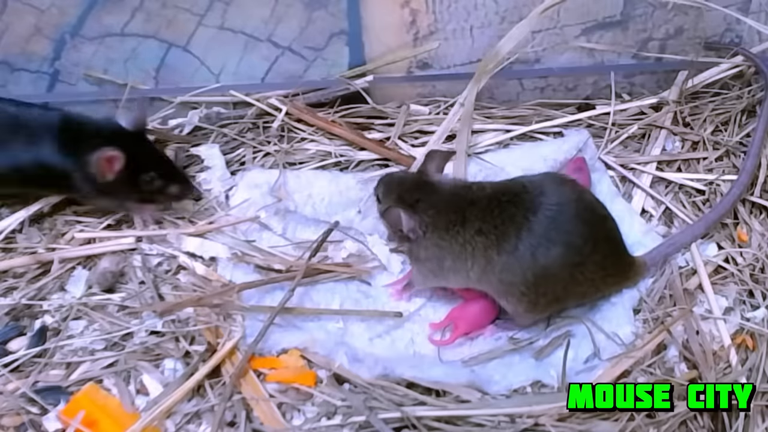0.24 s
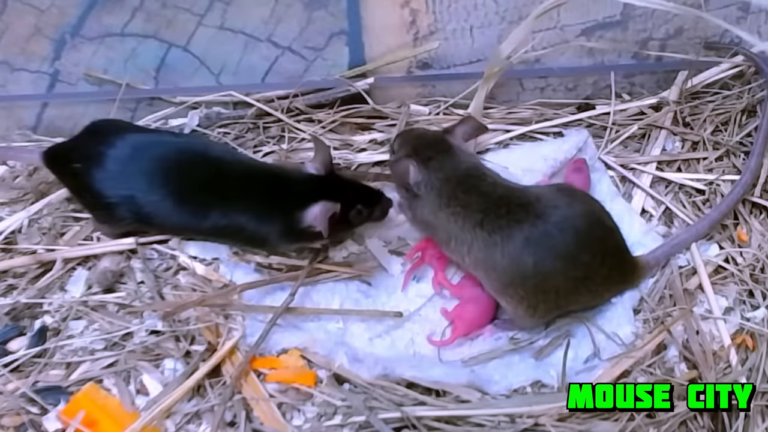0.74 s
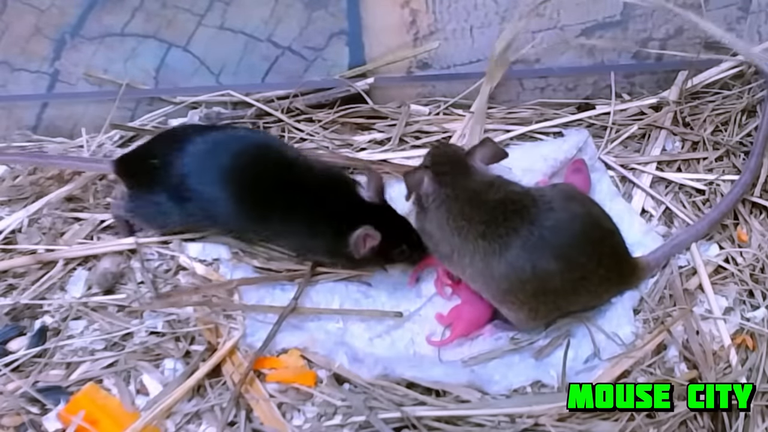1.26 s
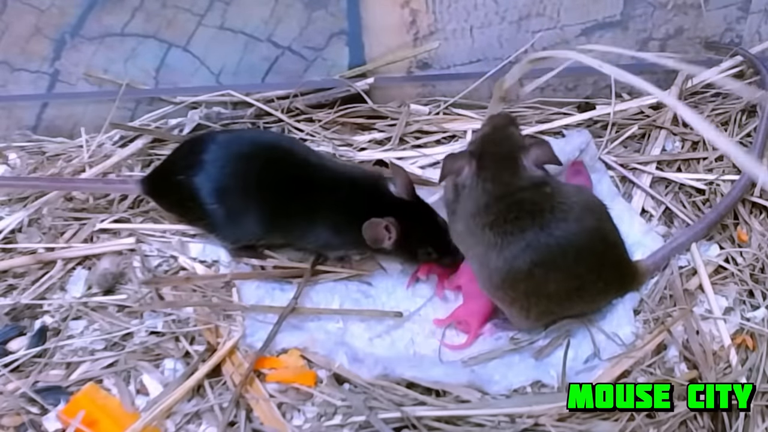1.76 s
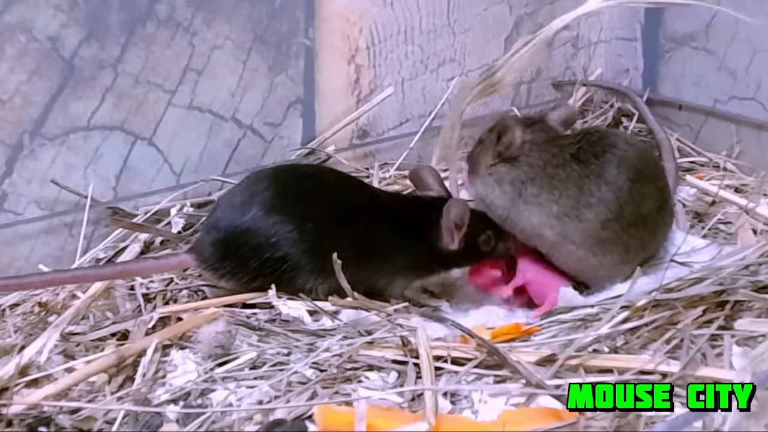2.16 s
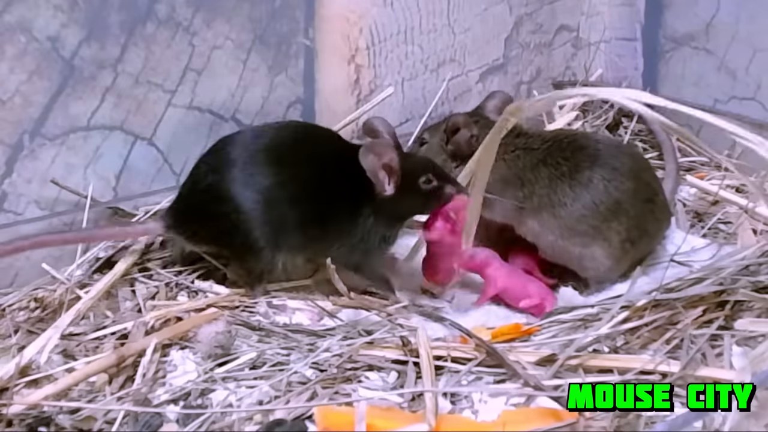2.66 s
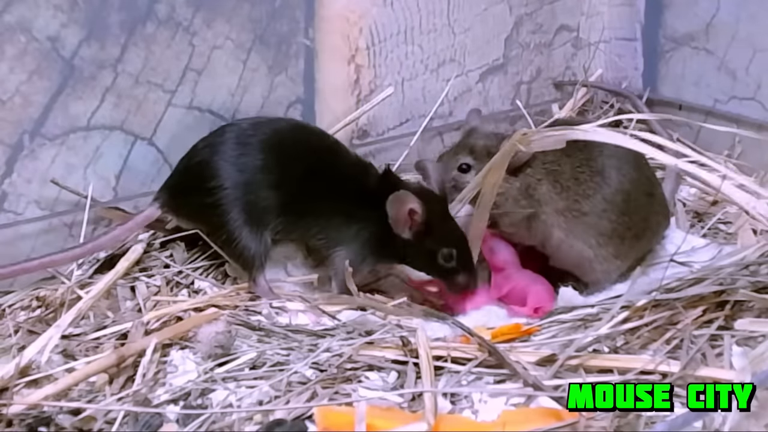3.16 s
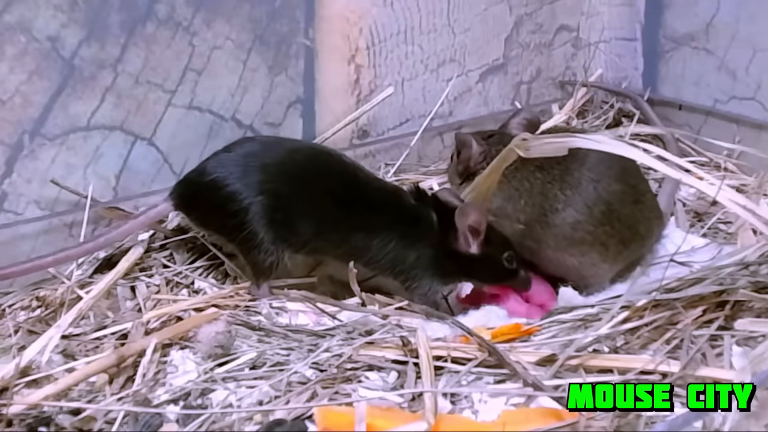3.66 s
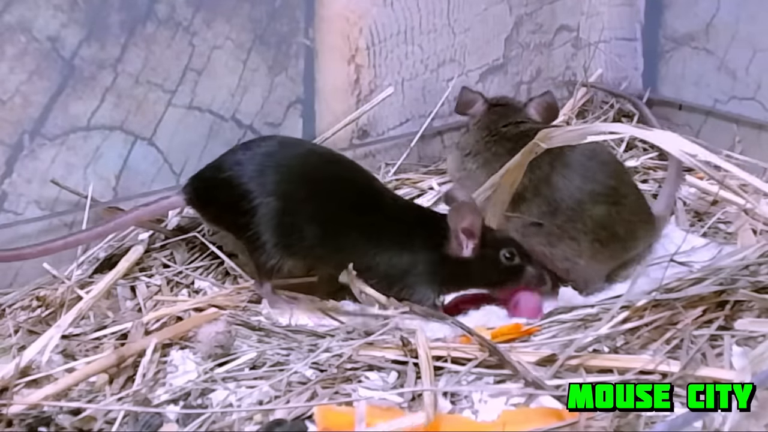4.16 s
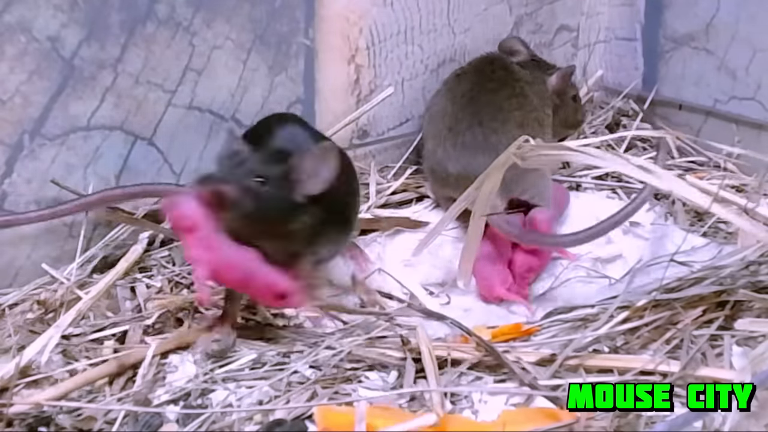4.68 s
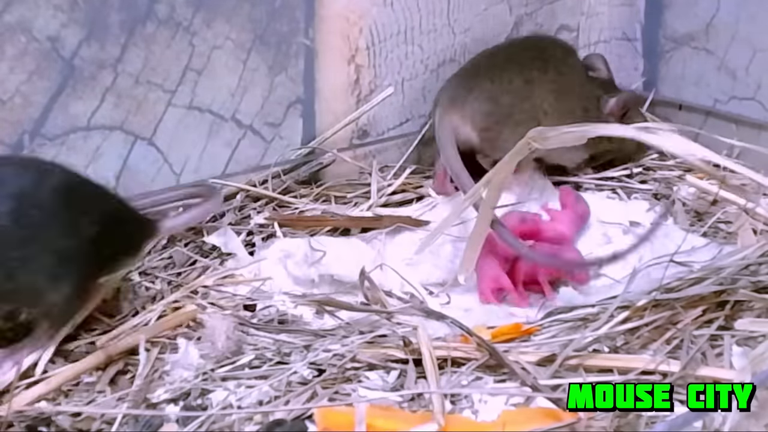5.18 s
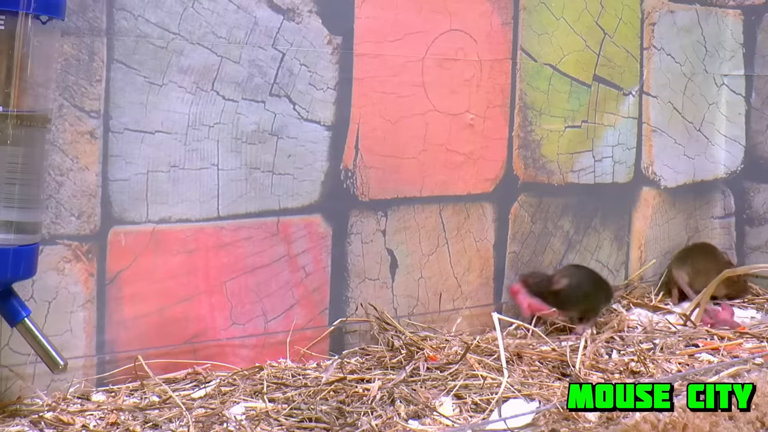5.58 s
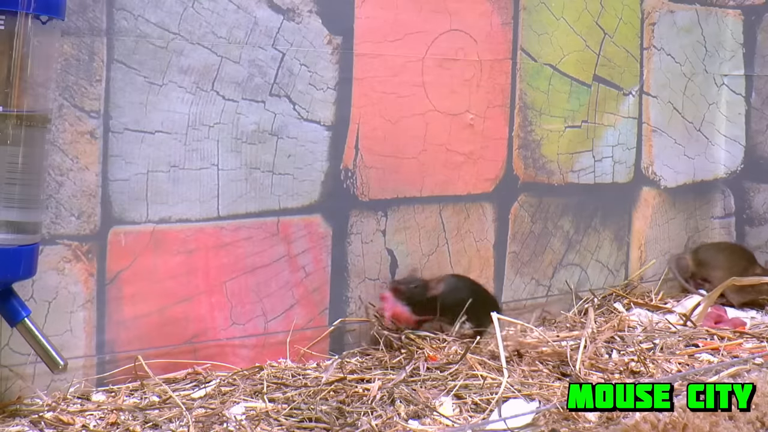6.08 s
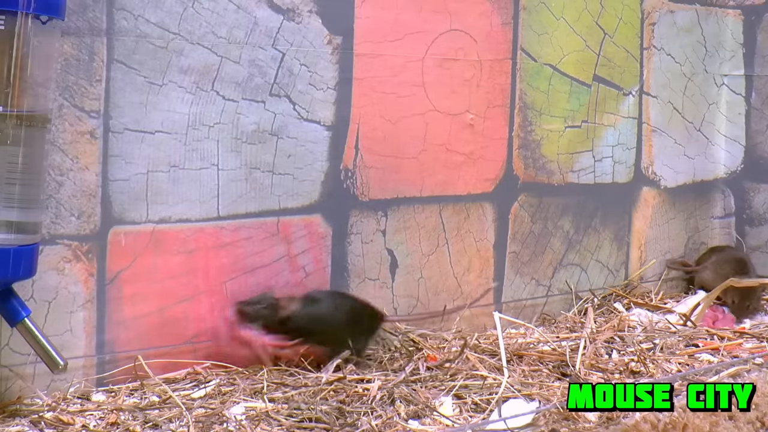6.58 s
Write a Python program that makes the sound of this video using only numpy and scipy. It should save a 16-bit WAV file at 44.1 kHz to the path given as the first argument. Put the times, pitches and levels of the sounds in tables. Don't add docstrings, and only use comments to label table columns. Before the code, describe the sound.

A small indoor cage with dry hay is heard closely in stereo, with soft air noise, low rumble and a faint gated electronic whine, stronger at first. From 0.1 to 0.7 s feet knock, tap and scuff, sharpest near 0.3, with hay rustles. A short pitched scrape and stalk snap come around 1.2. The tone changes at 2.05 and a pup begins: a muffled squeak and hum at 2.1, a yelp at 2.33, a long arched squeak at 2.6. A low thud meets a rising yelp at 2.9, then softer and falling squeaks at 3.2 and 3.4. A hard knock lands at 3.85. Rustles and light scuffs follow from 4.3, with a two-part wavering cry at 4.8 to 4.95. At 5.4 the sound becomes mono, farther and louder in air; ticks, snaps and scuffs thicken until the end, with a longer echoing, breathy cry at 6.25.

```python
import sys
import numpy as np
from scipy import signal
from scipy.fft import rfft, irfft, next_fast_len
from scipy.io import wavfile
from scipy.ndimage import uniform_filter1d

SR = 44100
rng = np.random.default_rng(int(sys.argv[2]) if len(sys.argv) > 2 else 0)


def unload_audio(sound):
    columns = np.transpose(np.atleast_2d(sound))
    steps = np.round(np.clip(columns, -1, 1) * 32767)
    wavfile.write(sys.argv[1], SR, steps.astype(np.int16))


def attenuation_scalar(level_db):
    decades = np.asarray(level_db, float) / 20
    return 10 ** decades


N = 301644

SCENE_CHANGES_S = 2.045, 5.407
TIME_S = np.arange(N) / SR
VIEW = np.searchsorted(SCENE_CHANGES_S, TIME_S)


def rms_one(x):
    return x / np.sqrt(np.mean(x ** 2) + 1e-20)


def at_hz(points, hz):
    point_hz, point_db = np.transpose(points)
    return np.interp(np.log(np.maximum(hz, 1)), np.log(point_hz), point_db)


def drift(rate_hz, size=N):
    r = np.exp(-2 * np.pi * rate_hz / SR)
    noise = rng.standard_normal(size + 9000)
    return rms_one(signal.lfilter([1], [1, -2 * r, r * r], noise)[9000:])


def resonance(x, hz, width_hz):
    r = np.exp(-np.pi * width_hz / SR)
    gain = (1 - r * r) / 2
    return signal.lfilter([gain, 0, -gain], [1, -2 * r * np.cos(2 * np.pi * hz / SR), r * r], x)


def coloured(spectrum, size, alike):
    padded = next_fast_len(size)
    hz = np.arange(padded // 2 + 1) * SR / padded
    shape = attenuation_scalar(at_hz(spectrum, hz)) * (hz < spectrum[-1][0])
    mid, side = rfft(rng.standard_normal((2, padded))) * shape
    likeness = np.clip(at_hz(alike, hz), 0, 1)
    mid = irfft(mid * np.sqrt(1 + likeness), padded)[:size]
    side = irfft(side * np.sqrt(1 - likeness), padded)[:size]
    return np.array([mid + side, mid - side]) / np.std(mid)


def by_view(*db):
    return attenuation_scalar(db)[VIEW]


def panned(x, db):
    return x * attenuation_scalar(np.array([[db / 2], [-db / 2]]))


def room_tone():
    # a spectrum [f/Hz, level/dB] and its rms [dB]
    first_air = [(15, -37), (25, -19), (157, 2.5), (285, 6), (489, -3.5), (988, -4), (1130, -9), (1400, -9),
                 (3720, -17), (5730, -20.5), (6210, -22), (6740, -15), (8140, -13.5), (16000, -44)], -57
    second_air = [(15, -50), (25, -2.5), (141, -5.5), (223, -5.5), (256, -2), (427, -12.5), (714, -10.5),
                  (1190, -16), (1290, -17.5), (4140, -22.5), (6560, -26.5), (7920, -29), (8590, -34.5),
                  (16000, -35)], -59.5
    third_air = [(15, -66), (25, -33), (123, -12), (200, -11), (285, -0.5), (531, -7.5), (754, -6),
                 (1370, -9), (1790, -10.5), (2990, -14), (3820, -11), (5570, -20.5), (10000, -32),
                 (16300, -41)], -47.5
    # [f/Hz, likeness 0..1]
    air_likeness = [(60, 0.95), (130, 0.74), (290, 0.79), (640, 0.68), (1410, 0.058), (3100, 0.016),
                    (6820, 0.052), (15000, 0.98)]
    # [f/Hz, left minus right/dB]
    first_balance = [(60, 19), (180, 2), (550, -0.5), (1650, 3), (4970, 5.5), (15000, 4)]
    # [f/Hz, level/dB in the first, second and third view]
    motor_tones = [(48.6, -65.5, -74, -78.5), (255.3, -65, -69, -56), (302.2, -69, -93, -59.5)]
    # [t/s, level/dB]
    rumble_levels = [
        (0.0, -81),
        (0.07, -57.5),
        (0.56, -56),
        (0.63, -57),
        (4.5, -62),
        (5.25, -60.5),
        (5.4, -59),
    ]
    out = np.zeros((2, N))
    edges = [0, *np.round(np.array(SCENE_CHANGES_S) * SR).astype(int), N]
    for (spectrum, db), start, end in zip((first_air, second_air, third_air), edges, edges[1:]):
        size = end - start
        out[:, start:end] = coloured(spectrum, size, air_likeness) * attenuation_scalar(db - 2.0 + drift(6, size))

    first_size = edges[1]
    hz = np.arange(first_size // 2 + 1) * SR / first_size
    tilt = attenuation_scalar(at_hz(first_balance, hz) / 2 * np.array([[1], [-1]]))
    out[:, :first_size] = irfft(rfft(out[:, :first_size]) * tilt, first_size)

    for hz, *db in motor_tones:
        tone = np.sin(2 * np.pi * hz * TIME_S + 0.27 * drift(1.3))
        out += by_view(*db) * np.sqrt(2) * attenuation_scalar(1.6 * drift(1.7)) * tone

    rumble_colour = [(12, -22.0), (30, 1.0), (70, -10.0), (130, -2.0), (200, -35)]
    rumble = coloured(rumble_colour, N, alike=[(10, 0.78), (100, 0.94)])
    rumble_db = np.interp(TIME_S, *np.transpose(rumble_levels), right=-120)
    return out + rumble * attenuation_scalar(rumble_db - 4.5)


def whine():
    # [f/Hz, on-time/s, left minus right/dB, (start/s, level/dB) in the first view, the same in the second]
    whine_tones = [(6134, 0.028, 67, (0.0123, -63.5), (.008, -80)), (8000, 0.013, 5.9, (0.03, -70),
                   (0.0028, -75.5))]
    frame_hz = 30
    out = np.zeros((2, N))
    swell_db = 1.5 * np.maximum(TIME_S - SCENE_CHANGES_S[0], 0)
    for hz, on_s, pan_db, (first_s, first_db), (second_s, second_db) in whine_tones:
        start = np.where(VIEW == 0, first_s, second_s)
        gate = uniform_filter1d(1. * ((TIME_S - start) % (1 / frame_hz) < on_s), size=60)
        level = attenuation_scalar(1.9 * drift(40) + 1.2 * drift(5) + swell_db)
        tone = np.sin(2 * np.pi * hz * TIME_S + 1.1 * drift(65)) * level
        out += by_view(first_db, second_db, -120) * gate * tone * attenuation_scalar(np.array([[3], [1.5 - pan_db]]))
    return out


def stirring():
    # [t/s, level/dB]
    bed_levels = [(0.0, -70), (0.76, -68.5), (2.06, -72), (3.53, -77.5), (4.336, -71.5), (4.79, -70.5),
                  (5.222, -69.5), (5.4, -65.5), (5.41, -63.5), (5.56, -67.5), (6.24, -58.5), (6.47, -63),
                  (6.588, -58), (6.84, -52)]
    # [t/s, peak level/dB, length/s]
    movements = [(0.091, -54, 0.04), (0.35, -61, 0.051), (0.625, -50, 0.05), (0.661, -47.5, 0.027),
                 (0.97, -57, 0.044), (1.66, -44.5, 0.021), (1.923, -60, 0.027), (2.364, -42, 0.044),
                 (4.426, -47.5, 0.06), (4.697, -56, 0.063), (5.073, -47.5, 0.079), (5.192, -49, 0.042),
                 (5.277, -50, 0.036), (5.542, -52, 0.078), (5.88, -45, 0.052), (6.004, -39, 0.014),
                 (6.166, -39, 0.043), (6.403, -38, 0.027), (6.428, -37, 0.04), (6.522, -34.5, 0.037),
                 (6.639, -30.5, 0.031), (6.726, -41, 0.022), (6.758, -39, 0.054)]
    level = attenuation_scalar(np.interp(TIME_S, *np.transpose(bed_levels)))
    for s, db, length in movements:
        since = TIME_S - s
        rise = np.clip(since / 0.0077 + 1, 0, 1)
        level = level + attenuation_scalar(db - 16.0) * rise * np.exp(-(np.maximum(since, 0) / length) ** 3)
    return level


def hay():
    centre = np.log([5960, 7900, 8550])[VIEW]
    narrow_db = np.array([6, 27, 2])[VIEW]
    patchy_db = np.array([7, 8, 4.4])[VIEW]
    born = rng.random(N) < 22000 * attenuation_scalar(1.5 * drift(35)) / SR
    size_db = 1.5 * np.minimum(rng.exponential(1, N), 4)
    grains = born * attenuation_scalar(size_db) * rng.choice([-1, 1], N)
    dealt = rng.integers(0, 14, N)
    out = np.zeros((2, N))
    for k, hz in enumerate(np.geomspace(1500, 16200, 14)):
        near = attenuation_scalar(-narrow_db * abs(np.log(hz) - centre) + patchy_db * drift(11.0))
        ring = resonance(grains * (dealt == k) * near + 1e-18, hz, 0.73 * hz)
        ring = resonance(ring, hz, 0.37 * hz)
        out += panned(ring, 1.6 * (-1) ** k + 0.39)
    running_rms = np.sqrt(uniform_filter1d(out.mean(axis=0) ** 2, size=2500) + 1e-12)
    return out / running_rms * stirring()


def bumps(events, length, rise, width, leak_db=0):
    size = 9000
    out, t = np.zeros((2, N + size)), np.arange(size) / SR
    floor_tail = attenuation_scalar(-10.5) * np.exp(-t / 0.11) * (1 - t / t[-1])
    envelope = np.clip(t / (rise * length), 0, 1) * (np.exp(-(t / length) ** 2) + floor_tail)
    for s, db, low_hz, high_hz, high_db in events:
        burst = rng.standard_normal((2, size)) * envelope
        burst[1] = 0.52 * burst[0] + 0.76 * burst[1]
        rings = []
        for hz in (low_hz, high_hz):
            broad = resonance(burst, hz, 0.24 * hz)
            leak = attenuation_scalar(leak_db - 3) * resonance(broad, hz, 1.16 * hz)
            ring = resonance(broad, hz, width * hz) + leak
            rings.append(ring / abs(ring).max())
        low, high = rings
        at = round((s - .003 - .6 * rise * length) * SR)
        low_gain = attenuation_scalar(-4 * attenuation_scalar(high_db))
        out[:, at:at + size] += attenuation_scalar(db) * (low * low_gain + attenuation_scalar(high_db) * high)
    return out[:, :N]


def knocks():
    # [t/s, peak level/dB, low ring f/Hz, high ring f/Hz, high ring level/dB]
    knock_events = [
        (0.1, -45.5, 1280, 1580, -6),
        (0.104, -47, 1600, 2000, -7),
        (0.32, -52, 352, 1390, -30),
        (0.817, -54, 304, 1920, 9),
        (1.94, -57, 273, 1790, 7),
        (2.01, -53, 294, 1190, 6.5),
        (2.909, -37, 274, 1170, -38),
        (3.855, -36.5, 943, 1730, -3),
        (3.898, -54, 865, 1940, 5.5),
    ]
    return bumps(knock_events, .04, rise=0.17, width=0.17)


def scuffs():
    # [t/s, peak level/dB, low ring f/Hz, high ring f/Hz, high ring level/dB]
    scuff_events = [(0.135, -49, 1590, 2140, -6), (0.18, -55, 1590, 900, -2), (0.359, -41, 990, 1500, -11),
                    (0.4, -48, 990, 1270, -2), (0.64, -53, 1400, 2080, 1), (0.85, -49, 900, 1900, -7),
                    (0.619, -55, 1000, 1370, -3), (1.66, -51, 568, 2100, 3), (2.766, -45.5, 623, 1420, -28),
                    (2.888, -43, 880, 1130, -35), (4.386, -44.5, 615, 1130, -24),
                    (4.503, -53.5, 604, 1080, -13), (0.975, -51, 2900, 3800, -2.5),
                    (1.03, -57, 2200, 2300, -5), (1.13, -51, 600, 1100, -2),
                    (2.26, -55.5, 1100, 1910, -1.5), (4.794, -49, 970, 1170, -17),
                    (4.997, -40.5, 613, 1110, -4.5), (5.16, -53, 638, 1120, -18),
                    (5.672, -46, 610, 1180, -11), (5.847, -38, 600, 1110, -5),
                    (5.944, -42.5, 620, 1030, -10), (6.19, -39, 407, 2170, 1), (6.237, -37, 1017, 1190, -8),
                    (6.275, -34.5, 960, 1410, -3.5), (6.31, -36, 800, 1100, -4),
                    (6.36, -36.5, 690, 434, -6.5), (6.4, -37, 335.5, 794, -3), (6.442, -35.5, 342, 1030, 0),
                    (5.694, -39.5, 640, 1200, -10), (5.816, -43.5, 600, 1080, -14),
                    (6.524, -45, 603, 2170, 0), (6.731, -44.5, 800, 1500, -0.5),
                    (6.429, -33, 600, 1340, -0.5), (6.593, -41, 1040, 1100, -23)]
    return bumps(scuff_events, .035, rise=0.71, width=0.13)


def taps():
    # [t/s, peak level/dB, low ring f/Hz, high ring f/Hz, high ring level/dB]
    tap_events = [(4.73, -55, 454, 2100, 3.5), (4.75, -57, 454, 2150, 4), (0.284, -30, 354, 1390, -17),
                  (0.304, -34.5, 338, 1380, -20), (1.233, -47, 890, 1450, -6),
                  (1.935, -45.5, 1850, 1510, -9), (2.766, -45, 606, 325, -1), (2.889, -42, 960, 604, -8),
                  (3.856, -43, 600, 910, -4), (4.388, -42, 630, 1140, -7.5), (5.0, -49, 627, 1160, -3),
                  (5.163, -44.5, 627, 1100, -10), (5.85, -39, 630, 1160, 2.5), (5.947, -38.5, 617, 980, 0),
                  (6.447, -38.5, 700, 1300, 4), (6.602, -35.5, 597, 1100, -3)]
    return bumps(tap_events, 0.01235, rise=0.141, width=0.26, leak_db=-10)


def scrape():
    # [t/s, peak level/dB, low ring f/Hz, high ring f/Hz, high ring level/dB]
    strokes = [
        (1.165, -41.5, 873, 1400, -13),
        (1.21, -54, 880, 1440, 1.5),
        (1.255, -43.5, 887, 1400, -11),
        (1.29, -42.5, 880, 1420, -3),
    ]
    return bumps(strokes, .04, rise=0.6, width=0.062, leak_db=-18)


def snaps():
    # [t/s, peak level/dB, ring f/Hz]
    snap_events = [(0.172, -42, 6100), (1.2327, -31.5, 6300), (4.315, -44, 9200), (4.4652, -37.5, 9560),
                   (4.6157, -39, 9400), (5.2839, -39, 9160), (5.46, -39, 5800), (5.7611, -35, 9200),
                   (5.8457, -38, 5790), (5.878, -26.5, 7260), (5.907, -30, 4340), (5.9885, -49, 5340),
                   (6.0123, -35, 8800), (6.0595, -30, 9200), (6.1483, -32, 6650), (6.5236, -32, 7370),
                   (6.5825, -33, 3860), (6.6165, -34, 14800), (6.6284, -34, 5570), (6.6963, -31, 3350),
                   (6.458, -43, 13000), (6.709, -26, 4130), (6.7315, -29, 4200)]
    out, t = np.zeros((2, N)), np.arange(900) / SR
    for s, db, hz in snap_events:
        crack = rng.standard_normal(900) * attenuation_scalar(-60 * t / 0.029)
        crack = resonance(crack, hz, 0.15 * hz) + 0.039 * np.diff(crack, prepend=0)
        crack = attenuation_scalar(db - 9.5) * crack / abs(crack).max()
        at = round(s * SR)
        out[:, at:at + 900] += panned(crack, 9.1 * (s < SCENE_CHANGES_S[0]))
    return out


def squeak(rows, tract, airs, first_db, fall_db, breath_db, alike, hoarse, sigh, hush):
    s, *columns = np.transpose(rows)
    sigh_s, sigh_db = sigh
    t = np.arange(s[0], s[-1] + sigh_s, 1 / SR)
    since, size = t - s[0], len(t)
    hz = uniform_filter1d(np.interp(t, s, columns[0]), size=260)
    effort_db = uniform_filter1d(np.interp(t, s, columns[1]), size=90)

    order = np.arange(1, 10)[:, None]
    dulling_db = 76 * since - 0.5 * np.exp(-since / 0.012)
    arch_end, break_end = .051, .071
    in_break = (since >= arch_end) * (since < break_end)
    hush_db = hush[0] * (since < arch_end) + hush[1] * in_break + 0.
    first_db = first_db - uniform_filter1d(hush_db, size=200)
    level_db = effort_db + at_hz(tract, order * hz) + first_db * (order == 1)
    level_db = level_db - (fall_db + dulling_db) * np.clip(order - 2, 0, 2.6)
    levels = attenuation_scalar(level_db) * (order * hz < 16200)

    broken = .4 * np.clip((.68 - hz / hz.max()) / .12, 0, 1) * (t > s[-4])
    jitter = 0.029 * (hoarse + 4 * broken) * drift(390, size)
    phase = np.cumsum(2 * np.pi * hz * (1 + jitter) / SR)
    apart = np.arccos(np.clip(alike, 0, 1)) / 2 * np.array([[1], [-1]])
    tone = 0
    for k, level in enumerate(levels):
        flutter = attenuation_scalar(1.07 * (1.5 + 0.028 * k) * drift(240, size))
        haze = (hoarse * min(.3 + .5 * k, 1) + broken) * drift(900, size)
        flutter = flutter * (1 - broken + haze)
        tone = tone + level * flutter * np.sin((k + 1) * phase + k * k + 1.08 * apart * drift(28, size))

    likeness = [(10, alike), (20, alike)]
    breath = attenuation_scalar(breath_db) * coloured(airs[0], size, likeness) * np.sqrt(np.sum(levels ** 2, axis=0))
    running_out = np.clip((t - s[-1]) / .006 + .5, 0, 1)
    escape = coloured(airs[1], size, likeness) * attenuation_scalar(sigh_db) * running_out * (t[-1] - t) / sigh_s
    air = (breath * (1 - running_out) + escape) * attenuation_scalar(1.2 * drift(100, size))
    onset = np.clip(since / 0.0027, 0, 1)
    return (np.sqrt(2) * tone * (1 - running_out) + air) * onset


def cage(x):
    t = np.arange(int(.3 * SR)) / SR
    decay = attenuation_scalar(-60 * t / 0.057) + 0.57 * attenuation_scalar(-60 * t / .24)
    tail = rng.standard_normal((2, len(t))) * decay * (t > .001)
    tail = signal.lfilter([1], [1, -.3], tail)
    tail = tail / np.sqrt(np.sum(tail ** 2, axis=1, keepdims=True))
    return signal.fftconvolve(x[None], tail, axes=1)[:, :N]


def pup():
    # [t/s, pitch f/Hz, effort level/dB]
    first_run = [
        [(2.073, 1864, -52), (2.08, 2094, -51.5), (2.091, 1980, -45.5), (2.098, 1625, -55), (2.104, 1510, -46)],
        [(2.105, 2470, -48), (2.11, 2540, -40), (2.117, 2530, -48), (2.128, 2730, -44.5), (2.14, 2630, -43),
         (2.16, 2460, -44), (2.174, 2410, -56)],
        [(2.329, 3400, -41), (2.334, 3460, -52), (2.34, 4280, -46.5), (2.348, 4340, -36.5), (2.36, 3870, -52),
         (2.373, 3800, -53)],
        [(2.574, 2200, -44), (2.58, 3070, -32), (2.587, 4050, -32.5), (2.624, 4380, -38), (2.64, 3840, -40.5),
         (2.662, 3630, -33.5), (2.688, 3955, -33), (2.708, 3200, -35), (2.722, 2650, -44)],
    ]
    second_run = [
        [(2.913, 2460, -36), (2.918, 3940, -37), (2.925, 4460, -30), (2.933, 5020, -31), (2.938, 4970, -37),
         (2.95, 5100, -72)],
        [(3.183, 1840, -64), (3.19, 2930, -38.5), (3.197, 3580, -37), (3.206, 3800, -42.5), (3.218, 3500, -48)],
        [(3.366, 2390, -46), (3.371, 4010, -40.5), (3.38, 4640, -31.5), (3.395, 4510, -39), (3.415, 4080, -42),
         (3.433, 3630, -42.5)],
        [(3.433, 3110, -42.5), (3.447, 2770, -47), (3.451, 2470, -47), (3.459, 2055, -40.5), (3.47, 1865, -46),
         (3.485, 1830, -48.5)],
    ]
    # [t/s after its start, pitch f/Hz, effort level/dB heard close, effort level/dB heard far]
    cry_arch = [
        (-.002, 1554, -58, -61),
        (.002, 2132, -50, -48),
        (.009, 3393, -36.5, -40),
        (.017, 4076, -31, -36),
        (.026, 4200, -31, -31.5),
        (.036, 3877, -32.5, -36.5),
        (.044, 3250, -36, -47),
        (.047, 3183, -46, -39),
        (0.052, 2768, -38, -41.5),
    ]
    cry_climb = [
        (.063, 2582, -36, -41),
        (.071, 2820, -40, -42.5),
        (0.076, 3200, -35.5, -42.5),
        (0.096, 3162, -34.5, -44.5),
        (.112, 3700, -35.5, -39.5),
        (0.13, 3870, -37, -36.5),
        (0.137, 3710, -35, -39),
        (.142, 3420, -38, -45),
    ]
    # [f/Hz, level/dB]
    near_tract = [(1800, -34), (2600, -8.5), (3300, -5.5), (3900, -2.5), (4300, -13.5), (4700, -24.5),
                  (5200, -8),
                  (7000, -6.5), (8500, -0.5), (10000, -7), (12500, -12), (14000, -26), (15500, -34)]
    far_tract = [(1800, 11), (2600, 3.1), (3300, 16.5), (3900, 13.8), (4300, 4.7), (4700, 17.5),
                 (5200, 2.9),
                 (7000, 5), (8500, -1.5), (10000, 2.5), (12500, 6), (14000, 15), (15500, 8)]
    # [f/Hz, level/dB]
    carried_tract = [(1800, -30), (2600, -28), (3200, -16.5), (3800, -1.5), (4200, -30), (5200, -25),
                     (6200, -5),
                     (7000, -5), (8500, 2.5), (10000, -2.5), (12500, -4), (13800, -11), (14800, -34)]
    # [f/Hz, level/dB]
    muffled = [(1800, -18), (3300, -15), (4200, -10), (5000, 1), (6200, 0), (7500, -18), (10000, -26),
               (15500, -45)]
    clearing = [(2600, -22), (4600, -2), (5400, -8), (6500, -12), (7800, -0.5), (10300, 0.5), (13000, -17),
                (15500, -35)]
    # [f/Hz, level/dB]
    near_breath = [(900, -44), (3600, -2.5), (4900, -12.5), (6200, -2.5), (10000, -6), (13500, -10),
                   (16000, -18)]
    far_breath = [(900, -70), (3000, -5.5), (6000, -14), (10000, -4), (12500, -13), (14000, 7.5),
                  (16000, 11)]
    far_sigh = [(1500, -13), (3000, -0.5), (4500, 0), (7000, -7), (9000, -9), (16000, -33)]
    # [left minus right/dB, left-right likeness, fundamental level/dB,
    # fall of upper partials/dB per order, breath under the voice level/dB]
    voices = [(0, 0.43, 5.5, -3.5, -25), (-2.5, 0.85, 1, 0.5, -17), (-3.5, 0.95, 7.5, -13, -20),
              (-2, 0.9, -4, -1, -19), (-2.5, 0.55, 5, -0.5, -22), (0.5, 0.66, 2.5, -0.7, -12),
              (1, 0.53, 7, -0.5, -20), (-1.5, 0.72, 5.5, 4.5, -13), (1, 0.47, 1.5, -5, -18),
              (7.5, 0.33, -3, -5, -9)]
    hoarseness = [.6, .7, .3, .2, .18, .6, .2, .5, .22, .1]
    # [length/s, level/dB]
    sighs = [(.006, -70), (0.018, -60), (0.034, -54), (0.018, -56), (.012, -69), (.02, -53), (.006, -70),
             (0.014, -59), (0.035, -44.5), (0.031, -35.5)]
    # [through the arch/dB, in the break/dB]
    cry_hush = [(9, 22), (0, 16)]
    cry = np.array(cry_arch + cry_climb)
    close_cry = cry[:, :3] + [4.805, 0, 0]
    far_cry = np.delete(cry, 2, axis=1) + [6.25, 0, 0]
    syllables = first_run + second_run + [close_cry, far_cry]
    tracts = [muffled, clearing] + [near_tract] * 6
    tracts += [carried_tract, far_tract]
    hushes = [(0, 0)] * 8 + cry_hush
    out = np.zeros((2, N))
    for rows, tract, voice, hoarse, sigh, hush in zip(syllables, tracts, voices, hoarseness, sighs, hushes):
        pan_db, alike, first_db, fall_db, breath_db = voice
        start_s = rows[0][0]
        airs = (far_breath, far_sigh) if start_s > SCENE_CHANGES_S[1] else (near_breath, near_breath)
        call = squeak(rows, tract, airs, first_db, fall_db, breath_db, alike, hoarse, sigh, hush)
        at = round(start_s * SR)
        out[:, at:at + call.shape[1]] += panned(call, pan_db)
    return out + cage(out.mean(axis=0) * by_view(-16, -16, -4.5))


def ticks():
    # [t/s, peak level/dB]
    tick_events = [(5.4306, -41), (5.46, -37), (5.5094, -49), (5.5458, -40), (5.6394, -41), (5.6944, -51),
                   (5.7394, -46), (5.7608, -42), (5.8254, -46), (5.8416, -53), (5.8416, -42), (5.8775, -37),
                   (5.8864, -41), (5.906, -31), (5.9334, -43), (5.9683, -45), (5.9868, -40), (6.0112, -42),
                   (6.0112, -42), (6.0294, -48), (6.0596, -39), (6.1484, -35), (6.1894, -38), (6.1994, -39),
                   (6.4567, -35), (6.4894, -45), (6.5236, -33), (6.5394, -38), (6.5824, -46),
                   (6.5824, -34.5), (6.6154, -43), (6.6283, -40), (6.6283, -36), (6.6674, -34),
                   (6.6957, -40), (6.7092, -34), (6.7311, -40), (6.7311, -34), (6.7794, -42), (6.8344, -45)]
    highpass = signal.butter(2, 2200, "high", fs=SR, output="sos")
    out, t = np.zeros(N + 900), np.arange(900) / SR
    for s, db in tick_events:
        click = signal.sosfilt(highpass, rng.standard_normal(900) * attenuation_scalar(-60 * t / 0.0093))
        at = round(s * SR)
        out[at:at + 900] += attenuation_scalar(db - 1) * click / abs(click).max()
    return out[:N]


def band_dropout(x):
    # [start t/s, end t/s]
    dropouts = [
        (2.6, 2.7),
        (4.812, 4.955),
    ]
    notched = x
    for _ in range(2):
        notched = notched - .98 * resonance(notched, 4900, 1100)
    inside = sum(1. * (TIME_S > start) * (TIME_S < end) for start, end in dropouts)
    share = uniform_filter1d(inside, size=200)
    return x + share * (notched - x)


def scene():
    floor = knocks() + scuffs() + taps() + scrape()
    bedding = hay() + snaps() + ticks()
    return room_tone() + whine() + floor + bedding + pup()


def roll_off(x):
    return signal.sosfilt(signal.butter(12, 16590, fs=SR, output="sos"), x)


def record(dry):
    close = signal.sosfilt(signal.butter(6, 15300, fs=SR, output="sos"), band_dropout(dry))
    x = np.where(TIME_S < SCENE_CHANGES_S[1], close, dry.mean(axis=0))
    x = signal.sosfilt(signal.cheby2(22, 60, 16330, fs=SR, output="sos"), x)
    x = .8 * np.tanh(x / .8)
    return roll_off(x)


dry = scene()
out = record(dry)
unload_audio(out)
```